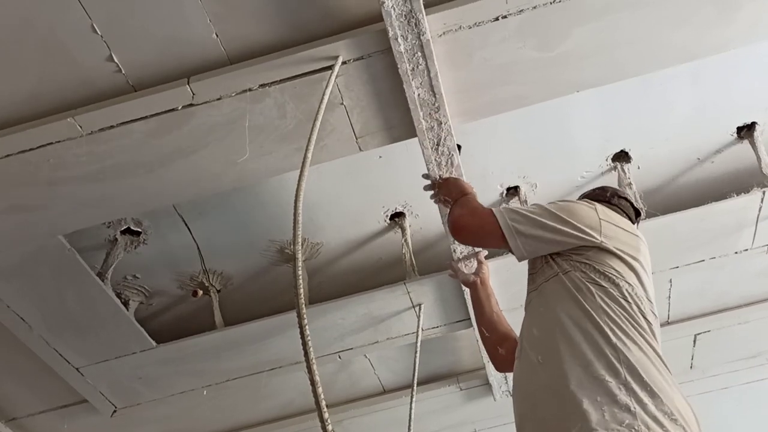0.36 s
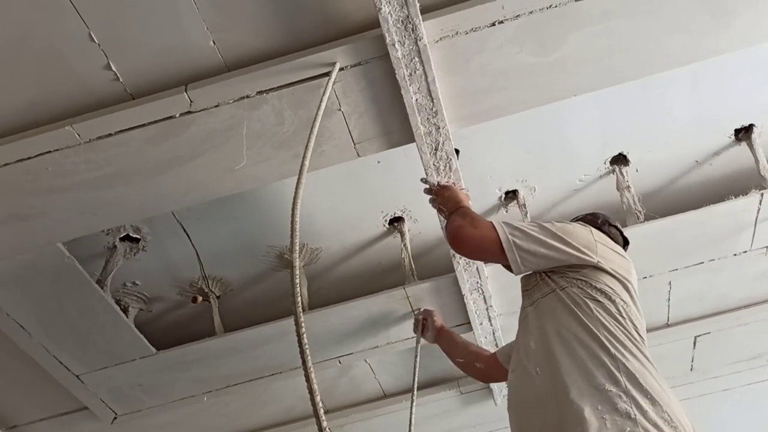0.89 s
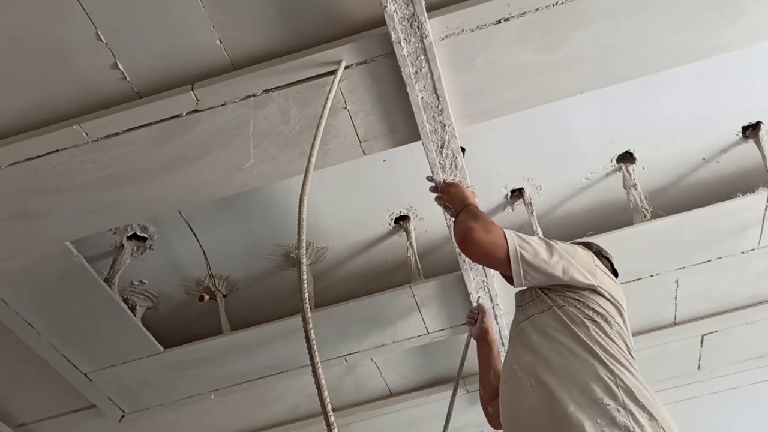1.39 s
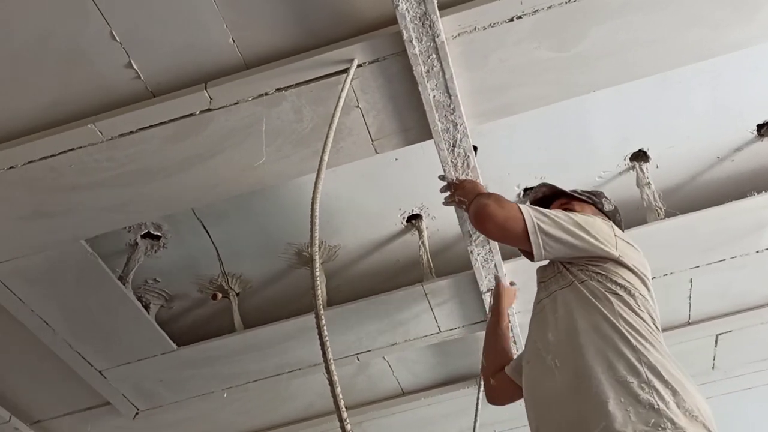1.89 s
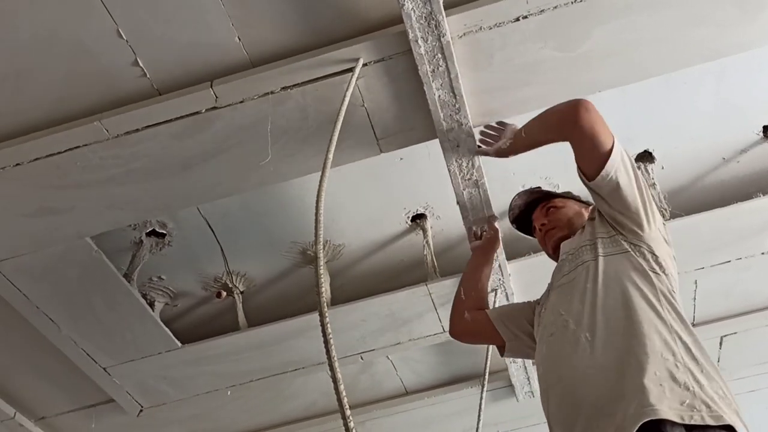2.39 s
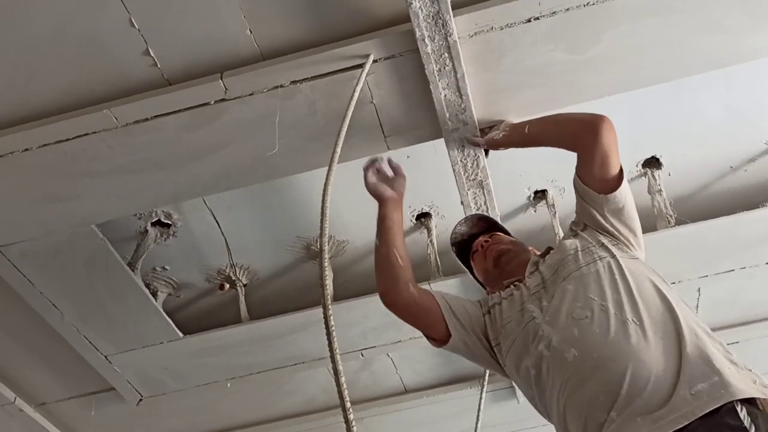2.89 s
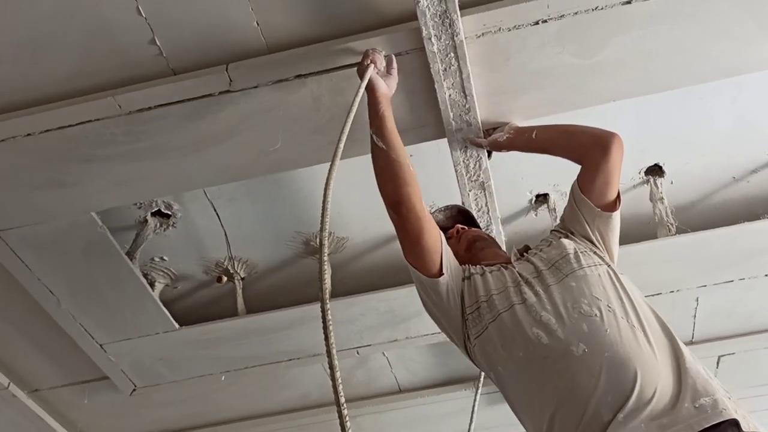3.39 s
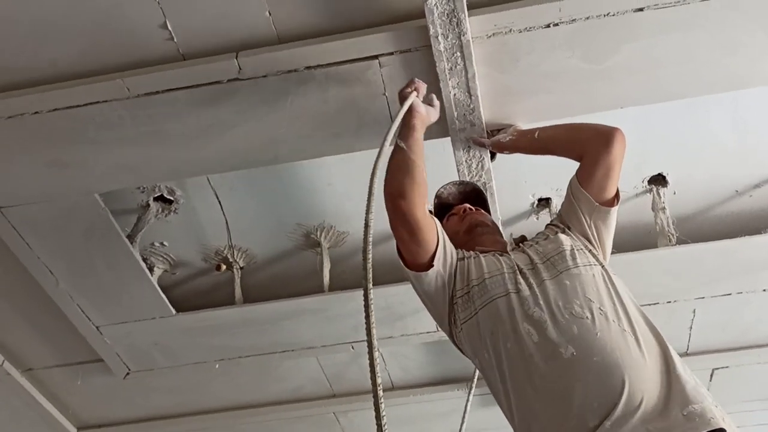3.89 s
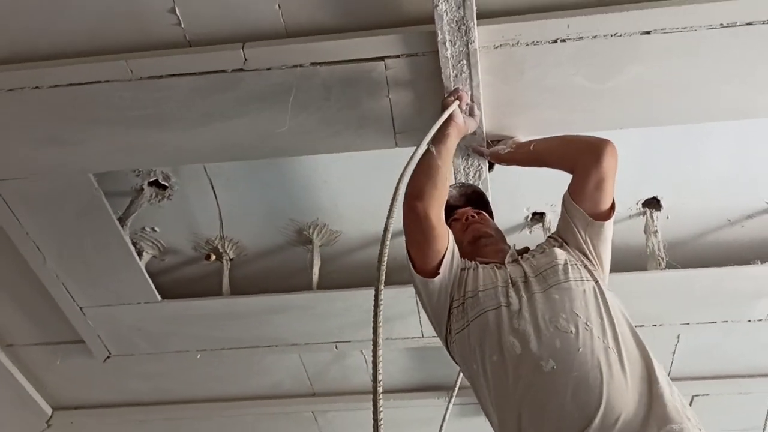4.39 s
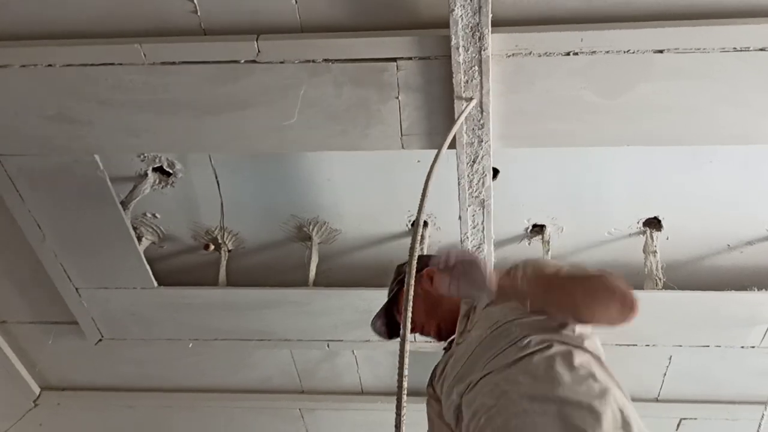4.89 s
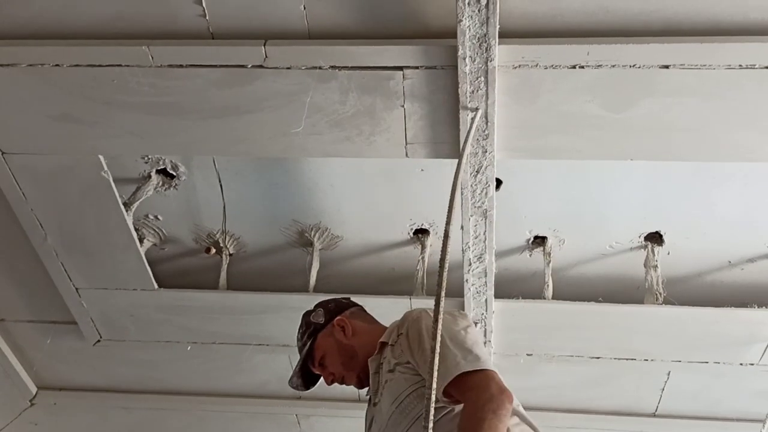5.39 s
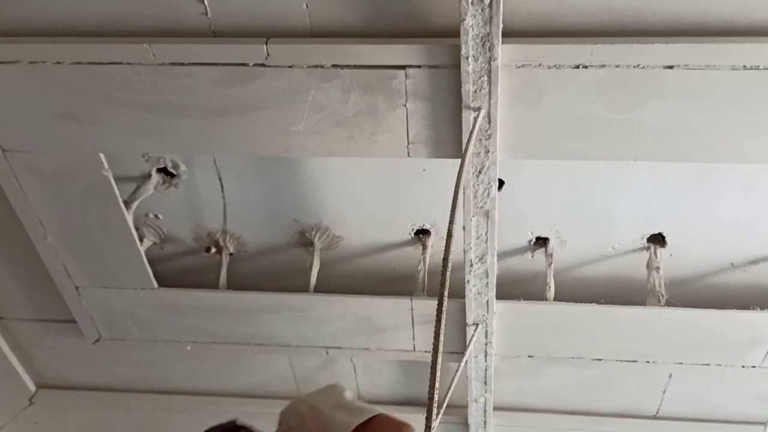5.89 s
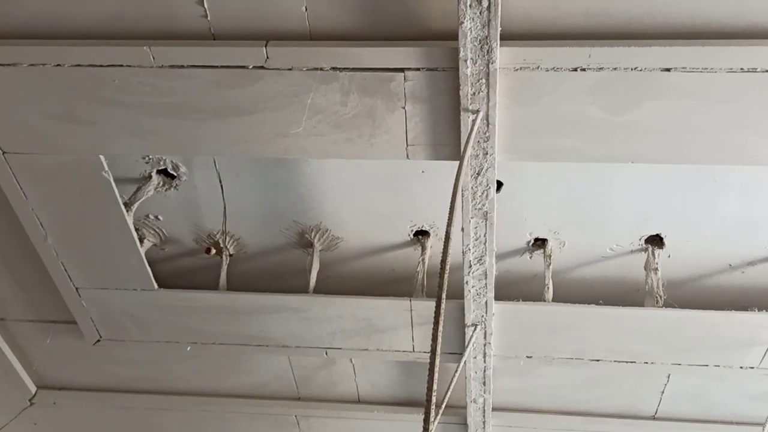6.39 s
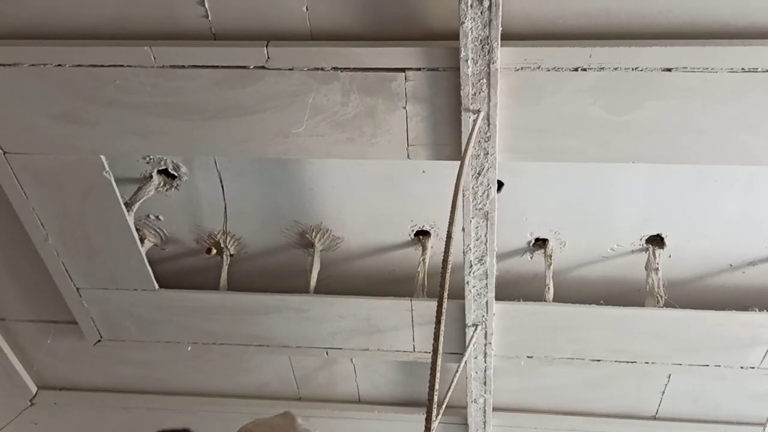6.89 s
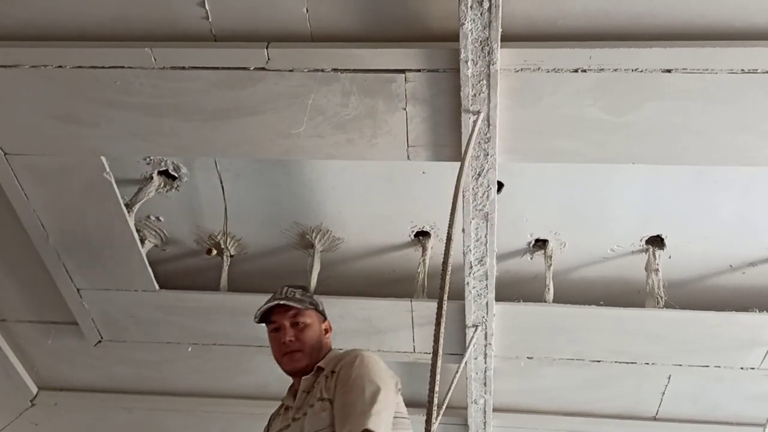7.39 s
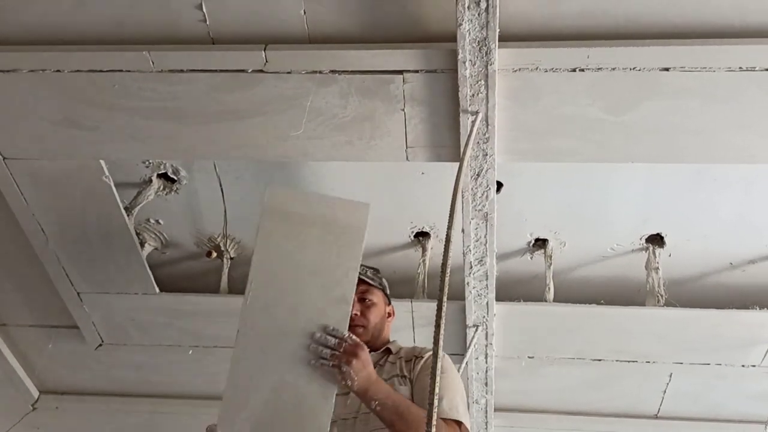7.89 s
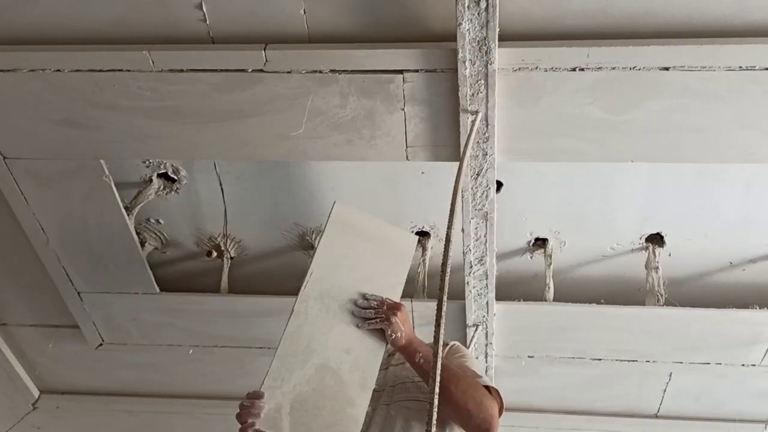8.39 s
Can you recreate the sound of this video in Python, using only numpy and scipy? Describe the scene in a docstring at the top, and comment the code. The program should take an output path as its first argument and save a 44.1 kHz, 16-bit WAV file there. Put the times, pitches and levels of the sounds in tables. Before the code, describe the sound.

Indoors, a hammer strikes wood about every half second, softens, stops; boards thud, a steel tool clinks, gritty shuffling and small ticks follow.

```python
"""A bare, echoing room where hammer blows land on timber: first on a beam, then more softly on a plank.
Each blow is noise coloured by timber and steel resonances and spread by decaying wall echoes.
Heavy thuds ring the floor boards as damped sines, and a steel tool clinks twice in beating partials.
Feet and boards scuff as shaped noise; hollow knocks and tiny ticks of handling sit over a low rush.
A phone microphone with gain control hears it almost in mono."""
import sys
import numpy as np
from scipy import signal
from scipy.fft import rfft, irfft, next_fast_len
from scipy.io import wavfile
from scipy.ndimage import map_coordinates

SR = 44100
rng = np.random.default_rng(int(sys.argv[2]) if len(sys.argv) > 2 else 0)


def master_out(mix):
    """Clip the mix to full scale and print it as 16-bit PCM to the path in sys.argv[1]."""
    frames = np.transpose(np.atleast_2d(mix))
    ceiling = np.clip(frames, -1, 1)
    pcm = np.round(ceiling * 32767).astype(np.int16)
    wavfile.write(sys.argv[1], SR, pcm)


def volts_from_db(level):
    """Convert decibel levels to linear amplitude ratios."""
    exponent = np.asarray(level, float) / 20
    return 10 ** exponent


N = 376173  # length in samples

# The rasp of hard surfaces, heard in drags and in the tool's click.
# Each row: frequency in Hz, level in dB.
RASP_COLOUR = [(500, -15), (1200, -10.5), (2000, -1.5), (3500, -4.5), (4700, -6), (5500, -9), (6500, -19)]
# Modes of the beam, named by the table of struck places.
# Each row: frequency in Hz, width in Hz, level in dB.
TIMBER = [(246.7, 25, -6), (281.4, 49.7, 4.5), (363, 75, -13.5), (565, 128, -4), (806, 114, -2.5),
          (888, 22, -2.5), (1490, 280, -12.5), (1733, 8.6, -12.5), (2224, 630, -17.5), (3190, 205, -15.5),
          (3694, 73, -11.5), (3830, 130, -11), (4480, 137, -8.5), (4660, 100, -9.5), (5340, 194, -5.5),
          (6270, 155, -12), (6770, 64, -23.5), (7660, 65, -14), (8600, 78, -29)]
# Modes of the plank, named there too. Each row: frequency in Hz, width in Hz, level in dB.
PLANK = [(275.7, 47, 1), (343.2, 22, 2), (444, 22, 0.5), (561, 54, -3.5), (655, 99, -7.5), (1014, 370, -10),
         (1770, 314, -37), (1970, 370, -29), (3400, 220, -19.5), (4090, 62, -17.5), (6830, 1000, -22.5),
         (7860, 550, -33.5)]


def along(points, hz):
    """Reads a curve of (Hz, value) points on a log frequency axis."""
    f, v = np.transpose(points)
    return np.interp(np.log(hz + 1), np.log(f + 1), v)


def unit(x):
    """Scales a sound to rms 1."""
    return x / np.sqrt(np.mean(x ** 2) + 1e-20)


def filtered(x, response):
    """Shapes a sound with a response given as a function of frequency."""
    size = next_fast_len(x.shape[-1] + 8192)
    spectrum = rfft(x, size) * response(np.fft.rfftfreq(size, 1 / SR))
    return irfft(spectrum, size)[..., :x.shape[-1]]


def resonances(modes, hz):
    """Causal sum of (Hz, width Hz, dB) resonances, with dark valleys between them."""
    return sum(volts_from_db(db) * 1j * hz * width / (centre * centre - hz * hz + 1j * hz * width)
               for centre, width, db in modes)


def add(out, s, x):
    """Mixes x into out from time s in seconds, which may lie before the start."""
    i = round(s * SR)
    x = x[max(-i, 0):][:len(out) - max(i, 0)]
    out[max(i, 0):][:len(x)] += x


def echo_field(slow=1):
    """A fresh one-second answer of the bare walls; bass builds late and dies slowly."""
    # How long the room rings. Each row: frequency in Hz, t60 in s.
    ring_time = [(100, 1), (300, 0.8), (1000, 0.71), (4000, 0.54), (8000, 0.45), (14000, 0.3)]
    # How slowly echoes gather, before slow stretches it. Each row: frequency in Hz, rise time in s.
    build_up = [(150, 0.049), (400, 0.01), (900, 0.01), (1500, 0.003), (8000, 0.0011)]
    hz, t, z = signal.stft(rng.standard_normal(SR), SR, nperseg=256)
    decay = volts_from_db(-60 * t / along(ring_time, hz)[:, None])
    rise = 1 - np.exp(-t / np.abs(slow * along(build_up, hz))[:, None])
    tail = signal.istft(z * decay * rise, SR, nperseg=256)[1][:SR]
    return tail / np.linalg.norm(tail)


def room_tone():
    """A low steady rush from outside: filtered noise."""
    # Colour of the rush. Each row: frequency in Hz, level in dB.
    air_colour = [(30, -27), (80, -5.5), (300, -5.5), (1000, -14.5), (4000, -20.5), (16000, -14.5)]
    return volts_from_db(-48.5) * unit(filtered(rng.standard_normal(N), lambda hz: volts_from_db(along(air_colour, hz))))


def ticks():
    """Small hard contacts of grit and board edges: brief noise bursts, each with its short echo."""
    # Each row: start in seconds, relative level in dB, brightness in dB.
    tick_rows = [(5.134, -43.5, -6.5), (5.3043, -34, -20), (5.8757, -35, -0.5), (6.316, -49, -2),
                 (6.344, -50, -2), (6.5486, -29, -16.5), (6.6098, -16.5, -19.5), (7.0538, -17.5, -18),
                 (7.376, -27, -25), (7.451, -26.5, -27), (7.7132, -31, -13.5), (7.9304, -30, -37),
                 (8.0218, -34.5, -15), (8.148, -31.5, -14), (8.1978, -27, -21), (8.2339, -22, -22),
                 (8.2523, -43, -16), (8.421, -29.5, -25)]
    out, t = np.zeros(N), np.arange(SR // 3) / SR
    for s, db, bright_db in tick_rows:
        contact = rng.standard_normal(len(t)) * volts_from_db(-60 * t / 0.049)
        tick = contact + 8 * echo_field()[:len(t)]
        colour = [(800, -41), (2500, -0.5), (4500, 0.0), (7000, bright_db + 20.0)]  # (Hz, dB)
        add(out, s, volts_from_db(db - 5) * filtered(tick, lambda hz: volts_from_db(along(colour, hz))))
    return out


def board_knocks():
    """Hollow board knocks: one resonance each, excited through the room's echo field."""
    # Each row: start in seconds, relative level in dB, resonance in Hz, its width in Hz.
    knock_rows = [(5.135, -36.5, 802, 90), (5.94, -23.5, 750, 80), (6.37, -37, 734, 69.4),
                  (7.32, -44, 444, 200), (7.453, -47.5, 3230, 200)]
    out = np.zeros(N)
    for s, db, hz, width_hz in knock_rows:
        add(out, s, filtered(echo_field(), lambda f: resonances([(hz, width_hz, db + 46.5)], f)))
    return out


def scuff():
    """Soles and boards drag over grit: dense grains of uneven size; each drag swells, holds and fades."""
    # Drags of soles and boards. Each row: start in seconds, length in seconds, pressure in dB,
    # brightness in dB (low rub below 0, grit above).
    strokes = [(4.76, 0.041, -58, -10), (4.894, 0.013, -49.5, 6.5), (5.019, .03, -54.5, 2),
               (5.13, 0.048, -52, 6), (5.289, 0.022, -58, 3), (5.44, 0.033, -49.5, -4.5),
               (5.805, 0.056, -40.5, -1.8), (5.87, .05, -45, -9.5), (5.934, .04, -36.5, -10),
               (6.05, 0.029, -39, 0), (6.3, 0.034, -61, -6), (6.36, .05, -59.5, -8),
               (6.545, .05, -47, 10.5), (6.605, 0.1, -38.5, 10.5), (6.745, 0.12, -36.5, 9.5),
               (6.88, 0.043, -41, 8), (6.975, 0.06, -35.5, 10), (7.31, 0.022, -55, 3),
               (7.375, 0.011, -57, 8), (7.45, 0.01, -52, -2), (7.56, 0.12, -47.5, 2),
               (7.93, 0.012, -60, 16.5), (8.02, .012, -75, 3), (8.146, 0.019, -50, 1),
               (8.23, 0.018, -44, 9), (8.5, .04, -49.5, 0)]
    # The low rub. Each row: frequency in Hz, level in dB.
    rub_colour = [(60, -6), (150, -10.5), (350, -1), (520, -4.5), (760, -1.5), (1100, -2), (1600, -6.5),
                  (2200, -18), (3000, -62)]
    # The high fizz of grit. Each row: frequency in Hz, level in dB.
    grit_colour = [(4500, -44.5), (6000, 6.5), (7500, 8), (10000, 7.5), (12000, 7), (15500, 11.5)]
    # (colour, how far brightness moves the level, fade in the room in dB per s)
    layers = [(rub_colour, -0.65, 90), (RASP_COLOUR, 0, 132), (grit_colour, 1.09, 177)]
    rise_share, rise_from_db = 0.54, -10.5  # share of the drag spent swelling, and where that starts
    out, t = np.zeros(N), np.arange(SR) / SR
    grain_size = volts_from_db(1.65 * map_coordinates(rng.standard_normal(N // 64 + 4), [np.arange(N) / 64]))
    for colour, bright_share, fade in layers:
        power = np.zeros(N)
        for s, length, db, bright_db in strokes:
            swell_db = rise_from_db * np.maximum(1 - t / (rise_share * length), 0)
            fade_db = fade * np.maximum(t - length, 0)
            add(power, s, volts_from_db(db + bright_share * bright_db + swell_db - fade_db) ** 2)
        grains = filtered(grain_size * rng.standard_normal(N),
                          lambda hz: volts_from_db(along(colour, hz)) * (hz < 20000))
        out += np.sqrt(power) * unit(grains)
    return out


def clink():
    """A steel tool rings in beating partials until a hand grips it; its click fills the room."""
    # Each row: start in seconds, level in dB, stretch of the ring times,
    # seconds until it is gripped, share of the click.
    clinks = [(5.423, -27, 2.4, 0.16, 1), (5.606, -15, 1, 0.42, 1)]
    # Frequencies of the steel tool's modes in Hz.
    tool_hz = [988, 2169, 2527, 2708, 4070, 4504, 5152, 5240, 5570, 6866, 12840, 13440]
    # The same modes in order. Each row: level in dB, t60 in s before the stretch,
    # dB added in the first clink, beat depth.
    tool_modes = [(-26.5, 0.84, 10.5, 0.76), (-15.5, 0.41, -3, 0.78), (-11, 0.41, -18, 1),
                  (-25.5, 0.12, 14.5, .2), (-10, 0.073, -25, 0.18), (0, 0.43, -2.5, 0.25),
                  (-26, 0.38, 9, .2), (-18, 0.38, 1, .2), (-12.5, 0.088, 1, .2), (-3.5, 0.32, -11, 0.39),
                  (-19, 0.37, -17, 0.23), (-24, .18, 11, .2)]
    out, t = np.zeros(N), np.arange(SR // 2) / SR
    for k, (s, db, stretch, grip, click) in enumerate(clinks):
        ring = np.zeros(len(t))
        for hz, (level, t60, more, depth) in zip(tool_hz, tool_modes):
            beat_hz = rng.uniform(19.0, 39)
            beat = 1 + depth * np.sin(2 * np.pi * (beat_hz * t + rng.random()))  # close mode pairs beat
            envelope = volts_from_db(level + more * (k == 0) - 60 * t / (t60 * stretch))
            ring += beat * envelope * np.sin(2 * np.pi * (hz * t + rng.random()))
        gripped = volts_from_db(-60 * np.maximum(t - grip, 0) / 0.13)
        ring *= gripped * (1 - np.exp(-t / 0.00017))
        # the walls smear the ring
        ring = 0.96 * ring + 0.33 * signal.fftconvolve(ring, echo_field())[:len(t)]
        burst = rng.standard_normal(len(t)) * volts_from_db(-60 * t / 0.061)
        snap = filtered(burst, lambda hz: volts_from_db(along(RASP_COLOUR, hz)))
        snap_echo = signal.fftconvolve(snap, echo_field())[:len(t)]
        add(out, s, volts_from_db(db) * (ring + click * (snap + 0.92 * snap_echo)))
    return out


def thud():
    """Soft heavy contacts set the floor boards ringing until weight damps them; the lowest mode rings on."""
    # Each row: start in seconds, level in dB, seconds of free ringing,
    # lift of the modes above 200 Hz in dB.
    thuds = [(4.194, -5.5, 0.17, -8.5), (4.236, -11.5, 0.074, 3), (4.376, -16, 0.028, -5),
             (5.039, -29, 0.071, -6), (5.13, -34, 0.49, -3)]
    # Modes of the floor boards, lowest first. Each row: frequency in Hz, level in dB, t60 in s.
    board_modes = [(80, -22, 3), (103.4, -13, 0.42), (139, -11, 1.5), (161, -17.5, 0.54), (234, -8, 0.25),
                   (288, -12, 1.2), (318, 5.5, 0.064), (379, -11.5, 0.36), (504, -10, 0.12)]
    out, t = np.zeros(N), np.arange(SR) / SR
    for s, db, free, upper_db in thuds:
        damping = volts_from_db(-60 * np.maximum(t - free, 0) / 0.036)
        (low_hz, low_db, low_t60), *rest = board_modes
        ring = damping * sum(volts_from_db(v + upper_db * (f > 200) - 60 * t / t60) * np.sin(2 * np.pi * f * t)
                             for f, v, t60 in rest)
        ring += volts_from_db(low_db - 60 * t / low_t60) * np.sin(2 * np.pi * low_hz * t)
        # loose boards shake
        rumble = unit(filtered(rng.standard_normal(SR), lambda f: 1 / (1 + (f / 260) ** 4)))
        ring += 0.17 * rumble * damping * volts_from_db(-60 * t / 2.7)
        add(out, s, volts_from_db(db) * ring * (1 - np.exp(-t / 0.0093)))
    return out


def hammer():
    """Each blow cracks on the timber, rings the steel head and fills the room."""
    # Each row: time in seconds, strength in dB, weight in dB (how much the timber booms),
    # steel in dB (how hard the head rings).
    blows = [(-.17, -8, -5.5, 0), (.264, -8, -3.5, 4), (0.692, -8.5, -6, 0.5), (1.112, -6.5, -6.5, 2.5),
             (1.556, -6.5, -6, 2), (2.014, -6, -8.5, 1.5), (2.439, -6, -8.5, 1.5),
             (2.985, -12.5, -8, -13.5), (3.41, -19, -0.5, -20), (3.899, -13, 2.5, -7),
             (4.412, -15.5, 7, -6)]
    # Modes of the steel head. Each row: frequency in Hz, width in Hz, level in dB.
    head_modes = [(12800, 27, -23), (14900, 76, -9)]
    # What is struck. Each row: modes, broadband share, bass in dB, knock in dB, edge in dB,
    # share of direct crack, share of pre-echo, slowness of the room's build-up.
    places = [(TIMBER, 0.12, -3.5, -3.5, -6.5, 0.036, 0.0052, 0.63),
              (PLANK, 0.29, -9.5, 0.51, -6.5, 0.03, 0.0022, 2.7)]
    plank_from = 2.7  # s, blows after this land on the plank
    # pairs: beam, plank
    low_pop_db, deep_db = (-6.5, 0.5), (-0.5, -23)  # low pop; bass left at the very bottom
    crack_rise_s, crack_t60_s = (0.0052, 0.0017), (0.068, 0.031)
    mode_drift, mode_scatter_db = .015, 1  # modes shift and vary in level from blow to blow
    knock_follows = 0.57  # share of the weight that reaches the knock
    out, t, early = np.zeros(N), np.arange(SR // 20) / SR, .009  # early: length of the pre-echo in s
    walls = [echo_field(place[-1]) for place in places]  # blows on one spot get much the same answer
    for s, db, weight_db, steel_db in blows:
        k = int(s > plank_from)
        modes, broad, bass_db, knock_db, edge_db, direct, pre_share, slow = places[k]
        modes = [(hz * (1 + mode_drift * rng.standard_normal()), width,
                  v + mode_scatter_db * rng.standard_normal()) for hz, width, v in modes]
        low_db = weight_db + bass_db
        spot = [(55, low_db + deep_db[k]), (130, low_db), (260, weight_db),
                (800, knock_db + knock_follows * weight_db), (1200, -5.5), (2500, -1),
                (7000, edge_db), (13000, steel_db)]  # (Hz, dB)

        def body(hz):
            """Timber and steel resonances over a broadband share, weighted by the blow's colour."""
            struck = broad + resonances(modes, hz) + resonances(head_modes, hz)
            return volts_from_db(db + 56 + along(spot, hz)) * struck

        crack = direct * rng.standard_normal(len(t)) * volts_from_db(-60 * t / crack_t60_s[k])
        crack *= (1 - np.exp(-t / crack_rise_s[k])) ** 2
        heard = .5 * walls[k] + 0.32 * echo_field(slow)
        heard[:len(t)] += filtered(crack, lambda hz: 1j * hz / (2000 + 1j * hz))
        add(out, s - .001, filtered(heard, body))
        # a brief low pop under each blow
        add(out, s, volts_from_db(db + low_pop_db[k]) * np.exp(-t / 0.011) * (t / 0.007))
        # a faint noise swells for 9 ms before each blow
        pre_echo = pre_share * rng.standard_normal(len(t)) * (t / early) ** 2 * (t < early)
        add(out, s - early, filtered(pre_echo, body))
    return out


def scene():
    """Both channels share one sound; a scattered copy makes only the treble above 5 kHz differ."""
    # Level of the left-right difference. Each row: frequency in Hz, level in dB.
    side_colour = [(5000, -60), (7000, -36), (8500, -20), (12000, -9), (16000, -8)]
    mono = room_tone() + ticks() + board_knocks() + scuff() + clink() + thud() + hammer()
    scatter = rng.standard_normal(SR // 100)
    scattered = signal.fftconvolve(mono, scatter / np.linalg.norm(scatter))[:N]
    side = filtered(scattered, lambda hz: volts_from_db(along(side_colour, hz)) * (hz > 5000))
    return np.array([mono + side, mono - side])


def low_pass(x):
    """Removes everything above the highest recorded frequency."""
    return signal.sosfilt(signal.butter(12, 16500, fs=SR, output="sos"), x)


def record(dry):
    """Microphone colour, then gain control that turns loud moments down and hardly senses deep bass."""
    # Response of the phone microphone. Each row: frequency in Hz, gain in dB.
    mic_colour = [(25, -22), (58, -10), (76, 0), (130, 4), (1150, -4), (1700, -1), (2900, -3), (3700, 1),
                  (4700, -1.5), (5000, -6), (5900, -7), (6300, 0.5), (7000, 0.5), (7600, -1), (8400, -6.5),
                  (8800, -23.5), (9700, -30), (11400, -42), (11700, -14), (15700, -17.5), (16000, -60)]
    x = filtered(dry, lambda hz: volts_from_db(along(mic_colour, hz)))
    sensed = filtered(x.mean(0), lambda hz: (1j * hz / (250 + 1j * hz)) ** 2)
    keep = np.exp(-1 / (0.014 * SR))  # level follower with a 14 ms time constant
    level_db = 10 * np.log10(signal.lfilter([1 - keep], [1, -keep], sensed ** 2) + 1e-12)
    x = x * volts_from_db(-.55 * np.maximum(level_db + 26.0, 0))
    x = x / (1 + np.abs(x / .68) ** 6) ** (1 / 6)  # soft clipping towards 0.68
    return low_pass(x)


dry = scene()
out = record(dry)
master_out(out)
```